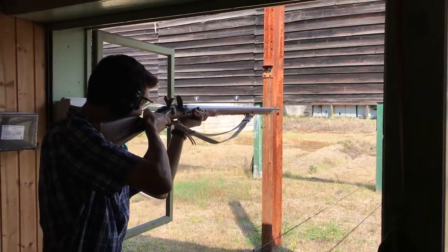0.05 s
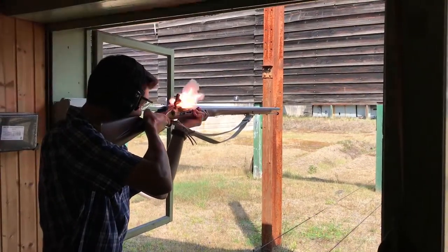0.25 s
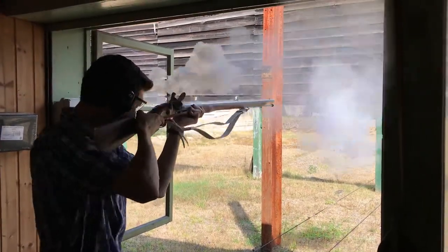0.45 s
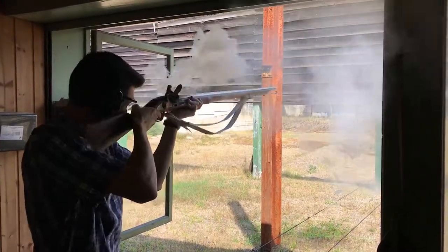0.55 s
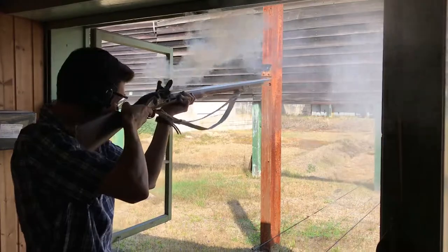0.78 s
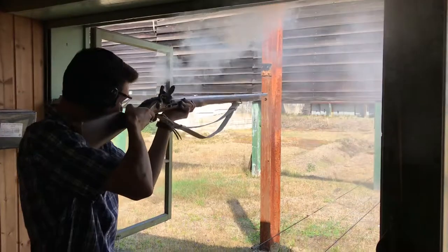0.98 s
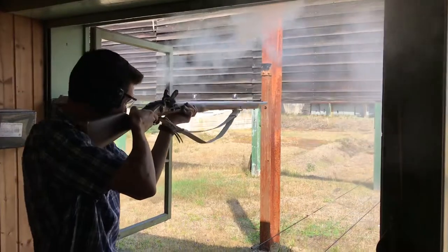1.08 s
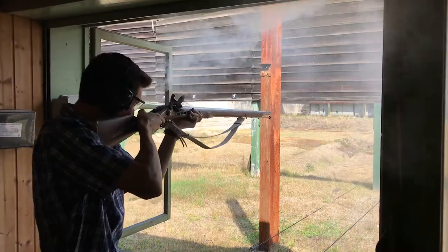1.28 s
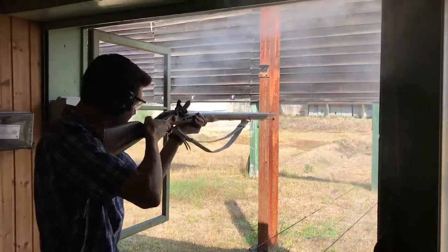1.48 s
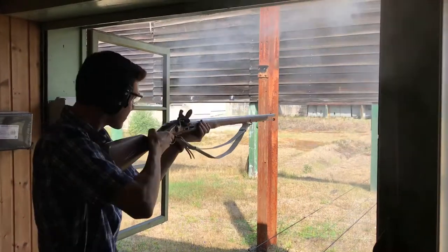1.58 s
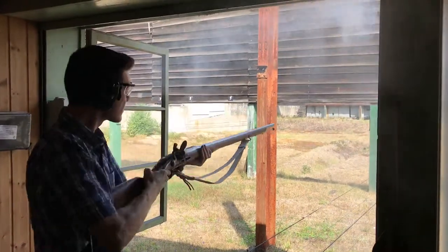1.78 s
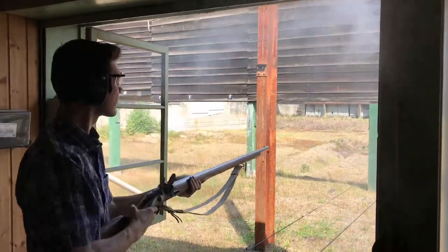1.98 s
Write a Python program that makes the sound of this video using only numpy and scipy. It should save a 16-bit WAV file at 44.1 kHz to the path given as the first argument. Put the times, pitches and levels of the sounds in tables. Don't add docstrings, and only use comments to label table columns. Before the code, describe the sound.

A flintlock musket fires: bright steel lock clatter, a brief soft puff, then a huge rough blast booming in a wooden shed. A sharp slap echo returns, then a dull rolling tail; close microphone, limited peak.

```python
import sys
import numpy as np
from scipy import signal
from scipy.fft import rfft, irfft, next_fast_len
from scipy.io import wavfile
from scipy.ndimage import uniform_filter1d

SR = 44100
rng = np.random.default_rng(int(sys.argv[2]) if len(sys.argv) > 2 else 0)


def int16_out(signal):
    q = np.round(np.clip(np.atleast_2d(signal).T, -1, 1) * 32767)
    wavfile.write(sys.argv[1], SR, q.astype(np.int16))


def attenuation_scalar(level_db):
    decades = np.asarray(level_db, float) / 20
    return 10 ** decades


N = 90404
T = np.arange(N) / SR
SEAR_S, PUFF_S = 0.1938, 0.345

CENTRES = np.geomspace(30, 17000, num=14)


def evened(x):
    return x / np.sqrt(np.mean(x ** 2) + 1e-20)


def read(points, hz):
    f, value = np.transpose(points)
    return np.interp(np.log(hz + 1), np.log(f + 1), value)


def per_band(points):
    return np.abs(read(points, CENTRES))[:, None] + 1e-4


def noise(colour, envelope=None):
    size = next_fast_len(N)
    hz = np.fft.rfftfreq(size, 1 / SR)
    spectrum = rfft(rng.standard_normal(size)) * attenuation_scalar(read(colour, hz))
    whole = irfft(spectrum, size)[:N]
    if envelope is None:
        return evened(whole)
    index = np.arange(len(CENTRES))
    place = np.interp(np.log(hz + 1), np.log(CENTRES), index)
    share = np.clip(1 - abs(place - index[:, None]), 0, 1)
    bands = irfft(share * spectrum, size)[:, :N]
    return (bands * envelope).sum(0) / np.std(whole)


def shape(t, rise, hold, t60):
    attack = np.clip(t / rise, 0, 1) ** 2
    return attack * np.exp(-np.log(1000) * np.clip(t - rise - hold, 0, None) / t60)


def flutter(depth_db, rate_hz):
    width = int(SR / rate_hz)
    smooth = uniform_filter1d(uniform_filter1d(rng.standard_normal(N), width), width)
    return attenuation_scalar(depth_db * evened(smooth))


def resonate(x, hz, width):
    turn = np.exp(2j * np.pi * hz * T)
    r = np.exp(-np.pi * width / SR)
    return 2 * (turn * signal.lfilter([1 - r], [1, -r], x / turn)).real


def swell(s, hz, db, length):
    window = np.sin(np.pi * np.clip((T - s) / length, 0, 1))
    return attenuation_scalar(db) * window * np.sqrt(2) * np.sin(2 * np.pi * hz * (T - s))


def ping(s, hz, db, t60):
    return attenuation_scalar(db) * shape(T - s, 0.00046, 0, t60) * np.sqrt(2) * np.sin(2 * np.pi * hz * (T - s))


def clicks(rows, colour):
    train = np.zeros(N)
    for s, db, *_ in rows:
        train[round(s * SR)] = attenuation_scalar(db)
    spectrum = attenuation_scalar(read(colour, np.fft.rfftfreq(256, 1 / SR))) * np.exp(-.9j)
    pulse = np.roll(irfft(spectrum, 256), 128) * np.hanning(256)
    return signal.oaconvolve(train, pulse / abs(pulse).max(), "same")


# (frequency [Hz], density [dB per Hz])
BLAST_COLOUR = [(30, -21), (110, -10), (350, -2), (700, -3.5), (1350, -4), (2500, -9), (5000, -8),
                (11000, -9), (15500, -12)]
# (frequency [Hz], rise [s])
BLAST_RISE = [(60, 0.026), (150, .06), (350, 0.037), (600, 0.028), (1300, 0.031), (4000, 0.02),
              (14000, 0.009)]
# (frequency [Hz], rate [dB/s])
BLAST_DECAY = [(60, 4), (300, 5), (1000, 19), (4000, 54.5), (14000, 113)]
# (frequency [Hz], curvature [dB/s^2])
BLAST_STEEPENING = [(60, 610), (1000, 694), (8000, 520), (15000, 610)]


def blast():
    start_s, level_db = 0.4694, -4.5
    rise = per_band(BLAST_RISE)
    wobble = flutter(1.4, 300)
    patches = np.array([np.roll(wobble, 1500 * (band // 2)) for band in range(len(CENTRES))])
    after = np.clip(T - start_s - rise, 0, 1)
    attack = np.clip((T - start_s) / rise, 0, 1) ** 1.5
    decay = attenuation_scalar(-per_band(BLAST_DECAY) * after - per_band(BLAST_STEEPENING) * after ** 2)
    crackle = flutter(1, 2500)
    return attenuation_scalar(level_db) * noise(BLAST_COLOUR, attack * decay * patches) * crackle


# (time [s], frequency [Hz], level [dB], length [s])
WALL_BOOMS = [(.515, 108.3, -8.5, 0.041), (0.524, 226.4, -19.5, 0.036), (0.541, 187, -8.5, 0.024),
              (0.538, 42, -21, 0.061), (0.545, 386, -16, 0.035), (.566, 155, -15, 0.036),
              (0.571, 79.5, -17, 0.045), (0.59, 347, -14.5, 0.015), (0.604, 352, -17.5, 0.029),
              (.592, 98, -14.5, 0.028), (0.61, 208.6, -23.5, 0.039), (0.632, 55.6, -25, 0.037),
              (0.642, 354.6, -32.5, 0.059)]
# (time [s], frequency [Hz], level [dB], length [s])
PANEL_MODES = [(.468, 600, -23.5, 0.035), (.488, 800, -22.5, 0.01), (.497, 1280, -14.5, 0.017),
               (.496, 1420, -19.5, 0.01), (.480, 4300, -16, 0.023), (.477, 9000, -16.5, .014),
               (.512, 630, -17, 0.02), (.518, 860, -18.5, 0.033), (.536, 530, -17, 0.019),
               (.540, 1270, -22, 0.024), (.564, 1120, -24, 0.027)]


def shed_walls():
    return sum(swell(*row) for row in WALL_BOOMS + PANEL_MODES)


# (time [s], level [dB], t60 [s])
LOCK_KNOCKS = [
    (0.1878, -53, 0.12),
    (0.2049, -21, 0.035),
    (0.2123, -15.5, 0.035),
    (0.2143, -18.5, 0.082),
    (0.2237, -12, 0.025),
    (0.2276, -18, 0.08),
    (0.2408, -16.5, 0.034),
    (0.2454, -22, 0.17),
]
# (frequency [Hz], density [dB per Hz])
CLATTER_COLOUR = [(150, -36.5), (450, -12), (800, -15.5), (1600, -5), (2600, -5.5), (5000, -6.5),
                  (8500, -7.5), (15200, -6), (16400, -21.5)]
# (frequency [Hz], bandwidth [Hz], level [dB])
STEEL_MODES = [(788, 100, -6.5), (1590, 180, -6), (2350, 350, -2.5), (3914, 330, -1), (5630, 130, 0.5),
               (8760, 200, 2), (9050, 250, -1.5), (13700, 300, -4), (15130, 180, -17.5)]
# (time [s], frequency [Hz], level [dB], t60 [s])
PART_PINGS = [(.2046, 14600, -26, .02), (.2046, 1880, -41, .03), (0.214, 8900, -17, 0.024),
              (0.2148, 5550, -12.5, 0.023), (.2135, 815, -26.5, 0.1), (0.215, 1485, -18.5, 0.052),
              (.219, 2228, -22, 0.087), (.2238, 8250, -10, 0.03), (.2238, 15400, -20, .03),
              (.2238, 12300, -19.5, .03), (.225, 1590, -16, 0.032), (0.229, 4020, -22.5, .04),
              (0.2403, 7900, -16.5, .05), (0.2429, 9150, -17.5, .04), (0.243, 2434, -21, 0.052),
              (.236, 842, -26, 0.14), (0.253, 1600, -29, 0.17), (0.27, 4070, -30, 0.05),
              (.275, 8950, -30, .03), (.310, 2400, -35.5, 0.17)]
# (time [s], frequency [Hz], level [dB], length [s])
STOCK_THUD = (.2115, 640, -26, .011)
# (frequency [Hz], density [dB per Hz])
SHED_COLOUR = [(150, -35.5), (480, -19), (800, -2.5), (1600, 0), (2400, 2.5), (3300, -5.5), (6500, -9),
               (8800, -6), (15500, -12)]
# (frequency [Hz], t60 [s])
SHED_DECAY = [(300, 0.49), (1000, 0.66), (2500, 0.43), (5000, 0.69), (14000, 0.4)]


def lock():
    rattle = noise(CLATTER_COLOUR)
    steel = 0
    for hz, width, db in STEEL_MODES:
        even_drive = np.sqrt(width) * attenuation_scalar(read(CLATTER_COLOUR, hz))
        steel = steel + attenuation_scalar(db) * resonate(rattle, hz, width) / even_drive
    knocks = 0
    for s, db, t60 in LOCK_KNOCKS:
        tick = attenuation_scalar(-2.5) * shape(T - s, 0.0001, 0, 0.0016)
        knocks = knocks + attenuation_scalar(db) * (shape(T - s, 0.00049, 0, t60) + tick)
    struck = knocks * (rattle + attenuation_scalar(-7) * evened(steel))
    flint = clicks([(LOCK_KNOCKS[2][0], -1)], CLATTER_COLOUR)
    scrape = evened(resonate(resonate(rattle, 2260, 1600), 2260, 1500))
    sear = attenuation_scalar(-37.5) * shape(T - SEAR_S, 0.0019, 0.019, 0.036) * scrape
    pings = sum(ping(*row) for row in PART_PINGS)
    shed = attenuation_scalar(-22) * noise(SHED_COLOUR, shape(T - 0.214, 0.012, 0.01, per_band(SHED_DECAY)))
    return struck + flint + sear + pings + swell(*STOCK_THUD) + shed


# (frequency [Hz], density [dB per Hz])
PUFF_COLOUR = [(100, -7), (220, 14), (350, -1.5), (600, -5), (2000, -24.5), (16000, -41.5)]
# (time [s], level [dB])
TOUCH_HOLE_SPITS = [(0.461, -30), (.4640, -32), (0.4679, -21.5), (.4700, -27.5), (0.4741, -21)]


def priming():
    puff = attenuation_scalar(-41.5) * noise(PUFF_COLOUR) * shape(T - PUFF_S, 0.023, 0.022, 0.53)
    spits = sum(attenuation_scalar(db) * shape(T - s, 0.00033, 0.00067, 0.025) for s, db in TOUCH_HOLE_SPITS)
    return puff + spits * noise([(100, 0.5), (1000, -3.5), (16500, -10.5)])


# (time [s], level [dB], t60 [s])
BAFFLE_SLAPS = [
    (.7842, -21, .03),
    (.8090, -30, .03),
    (.8482, -9, .04),
    (.8540, -23, .02),
    (.8652, -19, .04),
    (1.0745, -46, .04),
    (1.1300, -52, .02),
]
# (frequency [Hz], density [dB per Hz])
SLAP_COLOUR = [(300, -32.5), (1200, -17), (2500, 7.5), (5000, 6.5), (12000, -5), (16500, -20)]
# (frequency [Hz], t60 [s])
SLAP_DECAY = [(1000, 0.53), (4000, 0.36), (14000, 0.23)]


def baffle_slaps():
    envelope = 0
    for s, db, t60 in BAFFLE_SLAPS:
        burst = shape(T - s, 0.00012, 0.00024, 0.0062)
        tail = 0.22 * shape(T - s, 0.00068, 0, t60)
        envelope = envelope + attenuation_scalar(db - 15) * (burst + tail)
    spray = envelope * noise(SLAP_COLOUR)
    ring = attenuation_scalar(-30.5) * noise(SLAP_COLOUR, shape(T - BAFFLE_SLAPS[2][0], 0.0037, 0, per_band(SLAP_DECAY)))
    return clicks(BAFFLE_SLAPS, SLAP_COLOUR) + spray + ring


# (time [s], level [dB], hold [s], t60 [s])
BANK_RETURNS = [(0.712, -33.5, 0.022, 0.38), (0.78, -35, 0.02, 0.26), (0.796, -35, 0.017, 0.21),
                (0.83, -36, 0.0044, 0.064), (0.853, -36, 0.066, 0.37)]
# (frequency [Hz], density [dB per Hz])
BANK_COLOUR = [(150, -15), (300, -7.5), (500, -8.5), (800, -2.5), (1100, -2.5), (1600, -4), (2200, -11.5),
               (5360, -18.5), (16400, -47)]
# (time [s], frequency [Hz], level [dB], length [s])
HOLLOW_KNOCKS = [(0.72, 1110, -34, 0.014), (.778, 900, -28, 0.0055), (0.7853, 962, -24, 0.0049),
                 (0.792, 1010, -30, 0.014), (0.817, 1170, -33, 0.0044), (.825, 733, -35, 0.013),
                 (.833, 1050, -27, 0.012), (0.844, 1570, -30, 0.02), (0.848, 924, -32, 0.011),
                 (0.855, 747, -35, 0.015), (0.886, 1263, -34.5, 0.02), (.895, 1640, -42, 0.016),
                 (0.914, 820, -38, 0.0085)]


def earth_banks():
    returns = sum(attenuation_scalar(db) * shape(T - s, 0.0023, hold, t60) for s, db, hold, t60 in BANK_RETURNS)
    knocks = sum(swell(*row) for row in HOLLOW_KNOCKS)
    return returns * noise(BANK_COLOUR) * flutter(2.2, 237) + knocks


# (time [s], level [dB])
ROLL_LEVEL = [(.55, -82), (.68, -38), (.95, -41.5), (1.02, -39.5), (1.15, -41.5), (1.28, -43), (1.5, -42.5),
              (1.65, -43.5), (1.85, -48), (2.05, -53)]
# (frequency [Hz], density [dB per Hz])
VALLEY_COLOUR = [(100, -21.5), (250, -4), (500, -8.5), (800, -2.5), (1250, -2), (2000, -8.5), (3350, -13),
                 (6030, -21), (16400, -51)]
# (frequency [Hz], rate [dB/s])
AIR_LOSS = [(300, 12.5), (1200, -5), (2500, 9), (5000, 14.5), (10000, 39), (16000, 58)]


def valley_roll():
    roll = noise(VALLEY_COLOUR, attenuation_scalar(-per_band(AIR_LOSS) * (T - 0.9692)))
    level = attenuation_scalar(np.interp(T, *np.transpose(ROLL_LEVEL))) * (T > ROLL_LEVEL[0][0])
    return roll * level * flutter(0.8, 40)


# (frequency [Hz], density [dB per Hz])
WIND_COLOUR = [(20, -19.5), (45, -8), (94, -1), (130, -7.5), (174, -25.5), (230, -17), (300, -24.5),
               (1200, -44), (2500, -58.5)]
# (time [s], level [dB])
GUST_LEVEL = [(0, -35), (.32, -39.5), (.4, -39), (.69, -39.5), (.85, -39.5), (1.0, -48), (1.29, -54.5),
              (1.46, -46.5), (1.6, -40.5), (1.77, -44.5), (2.05, -41.5)]
# (frequency [Hz], level [dB])
CALM_LOSS = [(100, -1), (170, -3), (300, -9), (1200, -5)]
# (time [s], frequency [Hz], level [dB], length [s])
BOARD_MOANS = [(0.45, 105, -41, .09), (1.07, 148, -49, 0.08), (1.76, 142, -43.5, 0.12),
               (0.96, 230, -60, 0.78), (1.85, 228, -56, .2), (.62, 155, -33, .07)]


def wind():
    calm = attenuation_scalar(-per_band(CALM_LOSS) * (T < PUFF_S))
    gusts = attenuation_scalar(-0.5 + np.interp(T, *np.transpose(GUST_LEVEL)))
    moans = sum(swell(*row) for row in BOARD_MOANS)
    return gusts * noise(WIND_COLOUR, calm) * flutter(2.5, 23) + moans


# (frequency [Hz], density [dB per Hz])
CLOTH_COLOUR = [(1000, -35), (1850, 11), (2500, -34), (9000, -40), (13000, -27), (16000, -30)]


def creak_and_rustle():
    creak = attenuation_scalar(-57 - 60 * T / 0.025) * noise([(200, 1), (1000, -5), (4000, -15), (16000, -50)])
    rustle = attenuation_scalar(-50) * noise(CLOTH_COLOUR) * shape(T - 1.378, 0.0037, 0.016, 0.082)
    return creak + rustle


def hum():
    fade = attenuation_scalar(np.interp(T, [0.9, 1.05, 1.6], [-40, -6, 0]))
    return attenuation_scalar(-50) * np.sqrt(2) * np.sin(2 * np.pi * 274 * T) * fade


# (frequency [Hz], density [dB per Hz])
HISS_COLOUR = [(1000, -2), (8000, -0.5), (13000, 0), (16500, -5)]


def hiss():
    return attenuation_scalar(-82 - 7 * (T < SEAR_S)) * noise(HISS_COLOUR) * flutter(0.8, 20)


# (frequency [Hz], level [dB])
CAPSULE = [(3300, -0.5), (4200, 0), (5100, -2.5), (9200, -1.3), (10400, -5), (12000, -1.5)]


def scene():
    shot = blast() + shed_walls() + lock() + priming()
    echoes = baffle_slaps() + earth_banks() + valley_roll()
    mix = shot + echoes + wind() + creak_and_rustle() + hum() + hiss()
    return irfft(rfft(mix) * attenuation_scalar(read(CAPSULE, np.fft.rfftfreq(N, 1 / SR))), N)[None]


def top_cut(x):
    return signal.sosfilt(signal.butter(12, 16590, fs=SR, output="sos"), x)


def record(dry):
    threshold_db, ratio, release_db_per_s, ceiling = -2, 4.1, 295.5, 1.06
    power_db = 10 * np.log10(abs(uniform_filter1d(dry[0] ** 2, 130)) + 1e-12)
    fall = T * release_db_per_s
    held_db = np.maximum.accumulate(power_db + fall) - fall
    over_db = np.maximum(held_db - threshold_db, 0)
    limited = dry / attenuation_scalar((1 - 1 / ratio) * uniform_filter1d(over_db, 90))
    rounded = ceiling * np.tanh(limited / ceiling)
    finished = signal.oaconvolve(rounded, signal.firwin(255, 15950, fs=SR)[None], "same")
    return top_cut(finished)


dry = scene()
out = record(dry)
int16_out(out)
```